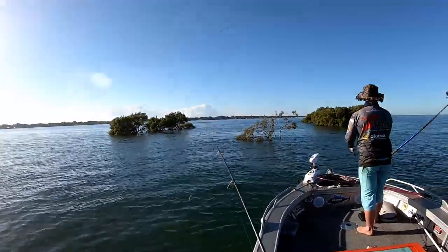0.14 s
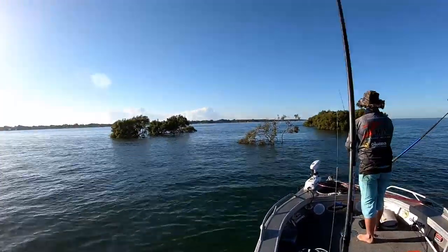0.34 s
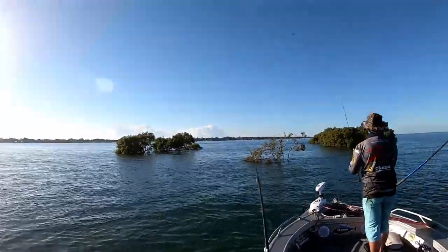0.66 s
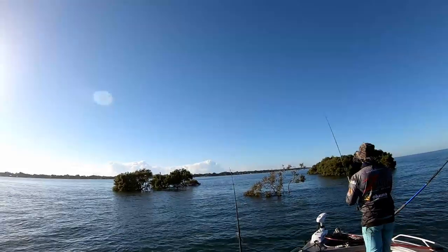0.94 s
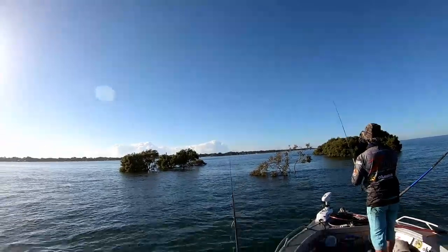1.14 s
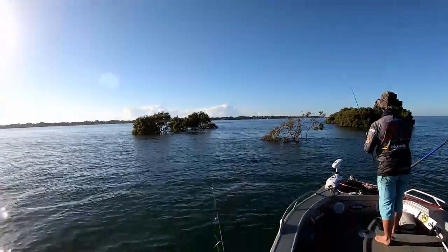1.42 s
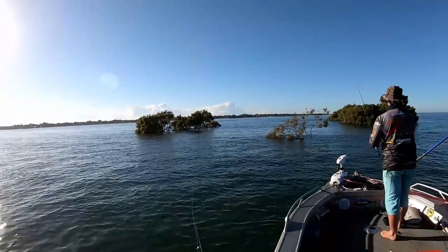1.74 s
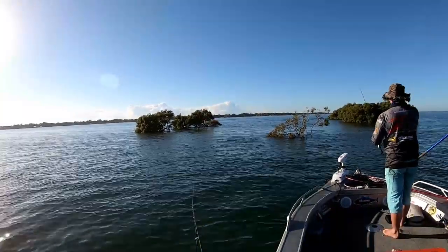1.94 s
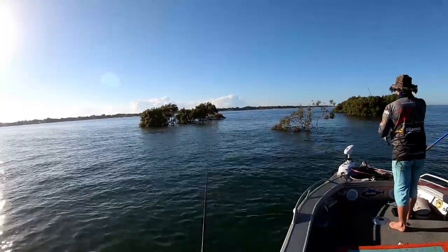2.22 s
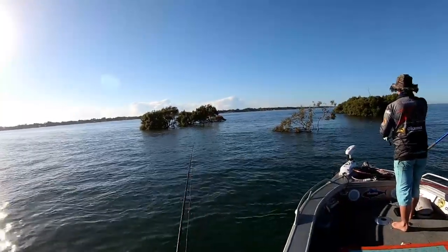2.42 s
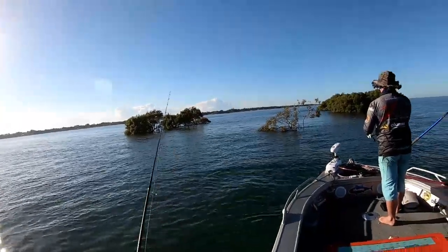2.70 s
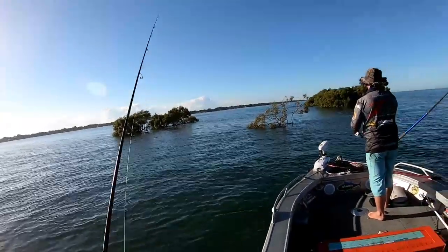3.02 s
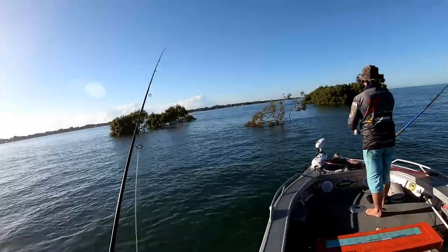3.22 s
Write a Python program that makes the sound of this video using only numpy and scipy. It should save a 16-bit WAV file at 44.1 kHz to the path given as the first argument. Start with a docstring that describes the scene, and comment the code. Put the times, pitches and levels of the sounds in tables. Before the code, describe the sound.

A small boat's electric motor hums while water laps and a fishing rod is cast.

```python
"""An electric motor hums, wind buffets the microphone and wavelets gulp and splash at a small fishing boat.
A rod is cast close by: the line whistles as it cuts the air, the rod swishes and line hisses off the reel.
The reel rattles, the tackle ticks now and then, and faint chirps, likely birds, come from far off.
The hum comes from the motor's turning shaft, the gulps from pockets of air ringing in the calm water."""
import sys
import numpy as np
from scipy import signal
from scipy.fft import rfft, irfft
from scipy.io import wavfile

SR = 44100
rng = np.random.default_rng(int(sys.argv[2]) if len(sys.argv) > 2 else 0)


def wrap_up_sound(samples):
    """Save the sound to the file named by the first command line argument, as 16-bit audio."""
    columns = np.atleast_2d(samples).T
    # keep every value between -1 and 1, then stretch to whole-number steps
    tamed = np.clip(columns, -1, 1)
    steps = np.round(tamed * 32767).astype(np.int16)
    wavfile.write(sys.argv[1], SR, steps)


N = 147735
T = np.arange(N) / SR


def from_db(db):
    """Turn decibels into a number to multiply a sound by."""
    return 10 ** (np.asarray(db) / 20)


def rms_one(x):
    """Scale a signal to an average power of 1."""
    return x / np.sqrt(np.mean(x ** 2) + 1e-20)


def in_time(rows):
    """Join a table's points with straight lines: one curve for each column after the time."""
    s, *columns = np.transpose(rows)
    return [np.interp(T, s, c) for c in columns]


def at_hz(points, hz):
    """Read between a table's frequencies, with octaves evenly spaced."""
    f, v = np.transpose(points)
    return np.interp(np.log(hz), np.log(f), v)


def pan(db):
    """Left and right gains that keep the total power; positive dB leans left."""
    gains = from_db(np.array([[.5], [-.5]]) * db)
    return gains / np.sqrt(np.mean(gains ** 2, axis=0))


def drift(hz):
    """A smooth random wobble, about 1 in size; more Hz makes it quicker."""
    r = np.exp(-80 * np.pi * hz / SR)
    slow = signal.lfilter([1], [1, -2 * r, r * r], rng.standard_normal(N // 40 + 2002))[2000:]
    return np.interp(np.arange(N) / 40, np.arange(len(slow)), rms_one(slow))


def filtered(x, hz, kind, order=2):
    """Keep the "low" side, the "high" side or a "band" of a sound."""
    return signal.sosfilt(signal.butter(order, hz, kind, fs=SR, output="sos"), x + 1e-18)


def ring(x, hz, decay_s):
    """Each click in x starts a tone that fades by 60 dB in decay_s."""
    r, w = from_db(-60 / (decay_s * SR)), 2 * np.pi * hz / SR
    return signal.lfilter([0, np.sin(w)], [1, -2 * r * np.cos(w), r * r], x + 1e-18)


def burst(s, rise_s, decay_s):
    """A straight rise from time s, then a fade of 60 dB in decay_s."""
    return np.clip((T - s) / rise_s, 0, 1) * from_db(-60 * np.clip((T - s - rise_s) / decay_s, 0, 4))


def noise_bands(colour, flicker_db):
    """Half-octave bands of flickering stereo noise, of total power 1, and their centre frequencies."""
    # how alike left and right are: (frequency [Hz], likeness [0-1])
    likeness = [(30, 0), (120, 0.86), (300, 1), (2000, 0.93), (5000, 1), (9000, 0.36)]
    edges = 20 * 2 ** np.arange(0, 9.6, .5)
    centres = np.sqrt(edges[1:] * edges[:-1])
    white, bands = rng.standard_normal((2, 2, N)), []
    for k, hz in enumerate(centres):
        mid, side = filtered(white[k % 2], edges[k:k + 2], "band")
        alike = at_hz(likeness, hz)
        gain = from_db(at_hz(colour, hz) + flicker_db * drift(15))
        bands.append(gain * (np.sqrt(1 + alike) * mid + np.sqrt(1 - alike) * side * [[1], [-1]]))
    return np.array(bands) / np.std(sum(bands)), centres


def noise(colour, flicker_db):
    """Stereo noise of power 1; its colour says how strong each frequency is."""
    return noise_bands(colour, flicker_db)[0].sum(axis=0)


def motor():
    """A turning shaft hums at multiples of its rate; the second, likely the propeller's, is loudest."""
    # tones of the hum: (multiple of the shaft rate, level [dB])
    tones = [(1, -6.5), (2, -3.5), (3, -18.5), (4, -17.5), (5, -24), (6, -30.5), (9, -35.5), (12, -33.5)]
    # how hard the motor works: (time [s], level [dB])
    load = [(0, -33.5), (1.0, -38), (1.5, -39.5), (2.3, -37), (2.9, -32.5), (3.35, -33)]
    shaft_hz = 44.7 * (1 + .00459 * drift(2.07))
    turn = 2 * np.pi * np.cumsum(shaft_hz) / SR
    hum = sum(from_db(db + drift(7.7)) * np.sin(k * turn + 2 * np.pi * rng.random()) for k, db in tones)
    return np.sqrt(2) * hum * from_db(in_time(load)[0]) * pan(db=4.5)


def wind():
    """Wind rumbles on the microphone, and single swirls of air suck and then push at its left side."""
    # wind strength: (time [s], level [dB], left minus right [dB])
    strength = [(0, -38, 31), (.15, -29.5, 41), (.36, -32.5, 28.5), (.52, -27.5, 33), (.68, -24, 37),
                (.78, -30.5, 34.5), (.95, -35, 31), (1.8, -41, -12), (2.3, -39.5, -3), (2.5, -41.5, -4),
                (2.9, -35, 26), (3.35, -34.5, 14.5)]
    # colour of the rumble: (frequency [Hz], level [dB])
    colour = [(20, -1), (40, 4), (65, 1.5), (120, -7.5), (170, -15), (300, -38.5), (600, -44.5),
              (1500, -99)]
    # thumping gusts: (centre time [s], peak level [dB], time from centre to peak [s])
    gusts = [(0.117, -17, 0.0048), (0.425, -17.5, 0.0054), (0.497, -10, 0.0022), (0.61, -25.5, 0.018),
             (0.65, -17, 0.01), (0.691, -13, 0.0022), (.735, -17.5, 0.0014)]
    thumps = np.zeros(N)
    for s, peak_db, to_peak in gusts:
        offset = (T - s) / to_peak
        thumps += from_db(peak_db) * offset * np.exp(1 - np.minimum(abs(offset), 20))
    db, side_db = in_time(strength)
    rumble = filtered(noise(colour, flicker_db=2), 31, "high")
    return from_db(db) * pan(side_db) * rumble + thumps * from_db([[0], [-28]])


def ripples():
    """Rippling water makes a soft wash with tiny ringing bubbles in it."""
    # strength of the ripples: (time [s], level [dB])
    strength = [(0, -54.5), (.5, -52.5), (1.1, -49.5), (1.4, -51), (1.55, -52.5), (2.1, -51), (2.3, -53.5),
                (2.6, -49.5), (2.9, -52.5), (3.15, -46), (3.35, -48)]
    # colour of the water: (frequency [Hz], level [dB])
    colour = [(100, -8), (220, 10), (350, -8.5), (650, -9), (1300, -16.5), (3200, -27), (4600, -35),
              (7000, -32), (9000, -54), (13000, -67)]
    bubbles_per_s, pitches = 170, np.geomspace(350, 4200, 20)
    pops = from_db(3.5 * np.minimum(rng.exponential(1, N), 2.8)) * rng.choice([-1, 1], N)
    pops *= rng.random(N) < bubbles_per_s / SR
    choice = rng.integers(0, len(pitches), N)
    bubbles = sum(ring(pops * (choice == k), hz, 14 / hz) * hz ** -.3 for k, hz in enumerate(pitches))
    water = noise(colour, flicker_db=1.5) + from_db(-11) * rms_one(bubbles)
    return from_db(in_time(strength)[0]) * water


def chirps():
    """Thin, unsteady tones, likely distant birds, each gliding through four pitches."""
    # calls: (start [s], length [s], level [dB], pitch at start, one third, two thirds, end [Hz])
    calls = [(-.01, .07, -65, 2650, 2750, 2900, 3050), (.055, .06, -56.5, 2300, 2600, 2560, 1650),
             (.09, .13, -71, 3550, 3560, 3470, 3400), (.125, .08, -67, 3000, 3060, 3020, 2900),
             (.14, .07, -65, 2020, 1930, 1790, 1700), (.152, .042, -58, 2600, 2380, 2220, 2190),
             (.265, .04, -64, 3300, 3180, 3190, 3330), (.297, .048, -56.5, 1750, 1960, 1900, 1730),
             (2.68, .125, -61, 2900, 3230, 3300, 4100)]
    out, waver = np.zeros(N), 1 + .012 * drift(220)
    for s, length, db, *pitches in calls:
        progress = np.clip((T - s) / length, 0, 1)
        hz = np.polyval(np.polyfit(np.linspace(0, 1, 4), pitches, 3), progress) * waver
        tone = np.sin(2 * np.pi * np.cumsum(hz) / SR)
        out += from_db(db + 2 * drift(60)) * np.sin(np.pi * progress) * tone
    return out


def far_off(x, decay_s=.45):
    """A soft echo from the shore blurs distant sounds."""
    tail = rng.standard_normal((2, SR)) * from_db(-60 * T[:SR] / decay_s)
    tail /= np.sqrt(np.sum(tail ** 2, axis=1, keepdims=True))
    return x + from_db(-6) * signal.fftconvolve(x[None], tail, axes=1)[:, :N]


def ticks(spread=1.45):
    """Bits of tackle touch in brief, dry ticks, each with its own brightness."""
    # ticks and scuffs: (start [s], level [dB], centre frequency [Hz], decay [s])
    contacts = [(0.241, -54.5, 5200, 0.018), (0.61, -58, 5050, 0.011), (0.689, -40, 2660, 0.012),
                (.727, -45, 7000, .014), (0.731, -30, 4970, 0.01), (1.614, -54, 5400, 0.016),
                (1.628, -52, 5000, 0.011), (1.793, -51, 1120, 0.041), (1.928, -41.5, 3130, 0.01),
                (1.939, -45, 4000, 0.02), (1.9458, -38, 2840, 0.016), (1.961, -48, 4740, .02),
                (1.969, -42, 3200, .011), (1.9944, -51, 2800, .013), (2.005, -47, 2600, 0.016),
                (2.258, -56, 2580, 0.042), (2.383, -58.5, 4350, 0.086), (2.431, -64.5, 7200, 0.096),
                (2.452, -57.5, 2600, 0.086), (2.513, -57.5, 3380, 0.025), (2.61, -44.5, 1280, 0.013),
                (2.837, -60, 2440, 0.031), (3.18, -60, 4850, 0.038), (3.279, -54.5, 5600, 0.027)]
    white, out = rng.standard_normal(N), np.zeros(N)
    for s, db, hz, decay in contacts:
        scuff = rms_one(filtered(white, [hz / spread, hz * spread], "band", order=3))
        out += from_db(db) * scuff * burst(s, .03 * decay, decay)
    return out


def line_hiss():
    """Line hisses off the reel and through the rod's rings."""
    # the running line: (time [s], level [dB])
    run = [(0, -89), (.25, -72), (.38, -62), (.55, -74), (.78, -57.5), (.84, -52.5), (1.0, -63), (1.4, -65),
           (1.55, -71.5), (1.82, -68), (2.0, -56), (2.06, -85)]
    # colour of the hiss: (frequency [Hz], level [dB])
    colour = [(400, 0), (1500, 4.5), (3200, 2.5), (5000, -9.5), (7000, -3), (9300, -8), (11000, -8),
              (14000, -18)]
    return from_db(in_time(run)[0] + drift(150)) * noise(colour, flicker_db=.6)


def splashes():
    """Wavelets break on the hull in short, grainy sprays."""
    # wavelets: (start [s], level at 1200 Hz [dB], rise [s], decay [s], brightness [dB per octave])
    wavelets = [(.312, -53, 0.012, 0.38, -3.5), (.945, -57, .01, 0.22, -8), (1.119, -56, .004, 0.13, 5.5),
                (1.42, -57.5, 0.043, 0.11, -5.5), (1.7, -55, 0.015, 0.12, -0.5),
                (1.916, -48, 0.017, 0.35, 3.5), (2.007, -48, 0.012, 0.17, -6), (2.041, -59.5, 0.04, .8, 0),
                (2.766, -53, 0.019, 0.18, -2), (3.022, -39, 0.022, .14, -2), (3.14, -51, 0.027, 0.16, -2.5)]
    # colour of the spray: (frequency [Hz], level [dB])
    colour = [(200, -2.5), (600, 4), (1200, 5), (1800, -0.5), (2400, -8.5), (3300, -5), (6000, -22.5),
              (9000, -25.5), (13000, -42)]
    bands, centres = noise_bands(colour, flicker_db=2.5)
    levels = np.array([from_db(db) * burst(s, rise, decay) for s, db, rise, decay, _ in wavelets])
    tilts = from_db(np.outer(np.log2(centres / 1200), np.array(wavelets)[:, -1]))
    spray = np.einsum("bcn,bn->cn", bands, tilts @ levels)  # add up the bands, each at its own level
    return spray * from_db(1.5 * drift(130))


def line_whistle():
    """The line cuts the air with a breathy whistle that follows its speed."""
    # path of the whistle: (time [s], pitch [Hz], level [dB])
    glide = [(.33, 9600, -103), (.44, 10000, -67.5), (.49, 9000, -66), (.52, 8200, -57), (.56, 7030, -62.5),
             (.6, 6520, -69.5), (.63, 6700, -57.5), (.66, 8600, -52.5), (.7, 9000, -68), (.76, 9350, -71)]
    hz, db = in_time(glide)
    blur = filtered(rng.standard_normal((2, 2, N)), 990, "low")  # smears the tone into a band of noise
    phase = 2 * np.pi * np.cumsum(hz) / SR
    whistle = rms_one(blur[0] * np.cos(phase) + blur[1] * np.sin(phase))
    sounding = (T > glide[0][0]) & (T < glide[-1][0])
    return whistle * from_db(db) * sounding * pan(db=4.5)


def rod_swish():
    """The rod rushes through the air, louder when faster, and the swing ends in a sharp swish."""
    # the rod's speed, heard as loudness: (time [s], level [dB])
    swing = [(.6, -100), (.65, -55), (.688, -40.5), (.712, -47), (.724, -44), (.731, -37), (.738, -44),
             (.749, -33), (.76, -43), (.785, -54), (.83, -81)]
    # colour of the rushing air: (frequency [Hz], level [dB])
    colour = [(300, -7.5), (900, -1.5), (1800, 1.5), (3200, -1), (5000, -13), (7500, 4.5), (10000, -26),
              (13000, -15)]
    # narrow peaks that colour the swish's noise: (frequency [Hz], level [dB])
    peaks = [(1403, -5), (1742, -2), (1971, -4), (2112, -6), (2401, -2), (2612, 0), (3475, -2), (3920, -5),
             (4245, -6), (4855, -3), (5688, -5), (7560, -9)]
    loudest_s, loudest_db, swell_s, decay_s = .749, -33, .07, .068
    rush = from_db(in_time(swing)[0] - 2 * drift(250)) * noise(colour, flicker_db=2.5)
    sharp_swish = sum(from_db(db + 3 * drift(50)) * np.sin(2 * np.pi * (hz * T + rng.random()))
                      for hz, db in peaks)
    fade_db = 60 * np.maximum((loudest_s - T) / swell_s, (T - loudest_s) / decay_s).clip(0, 4)
    return rush + rms_one(sharp_swish) * from_db(loudest_db - fade_db)


def washes(spread=1.26):
    """Water churns along the hull in narrow, bubbling bands of noise that die away."""
    # surges of water: (start [s], level [dB], centre frequency [Hz], rise [s], decay [s])
    surges = [(.937, -40.5, 493, 0.0029, .16), (1.139, -48, 447, 0.0079, 0.3),
              (1.25, -50.5, 930, .005, 0.18), (1.609, -54.5, 1045, 0.035, .7),
              (1.703, -52.5, 1370, 0.01, 0.065), (2.04, -57, 1250, 0.054, 2.26),
              (3.035, -40.5, 501, .012, 0.26)]
    white, out = rng.standard_normal(N), np.zeros(N)
    for s, db, hz, rise, decay in surges:
        churn = rms_one(filtered(white, [hz / spread, hz * spread], "band", order=3))
        out += from_db(db) * churn * burst(s, rise, decay)
    return out * from_db(-.5 * drift(60))


def gulps(pitch_rise=.093, roughness=.81):
    """Each pocket of air trapped at the hull swells, rings unsteadily and rises in pitch."""
    # air pockets: (start [s], level [dB], starting pitch [Hz], length [s])
    pockets = [(0.956, -41.5, 400, 0.021), (1.123, -30, 296, 0.016), (1.14, -38.5, 149, 0.035),
               (1.366, -42, 276, 0.084), (1.454, -46, 614, .022), (1.567, -37, 890, 0.0045),
               (1.574, -38, 760, 0.0024), (1.589, -33.5, 870, .016), (1.597, -34, 1074, 0.0099),
               (1.639, -48, 866, 0.011), (1.9175, -31, 1110, 0.0059), (1.92, -35.5, 214, .07),
               (1.927, -35.5, 1110, .006), (2.014, -46.5, 1230, 0.0074), (2.022, -41.5, 788, .025),
               (2.581, -53.5, 1910, .025), (3.042, -42.5, 1502, 0.028), (3.077, -47, 332, .2),
               (3.15, -36.5, 206.4, 0.055), (3.245, -53, 2146, 0.043)]
    out = np.zeros(N)
    for s, db, hz, length in pockets:
        age = np.clip((T - s) / length, 0, 10)
        swell = age / .28  # loudest at 28% of the length
        phase = 2 * np.pi * hz * length * (age + pitch_rise * age ** 2 / 2)
        churn = roughness * (drift(hz / 5) * np.sin(phase) + drift(hz / 5) * np.cos(phase))
        tone = (np.sin(phase) + churn) / np.sqrt(1 + 2 * roughness ** 2)
        out += from_db(db) * (swell * np.exp(1 - swell)) ** 2 * tone
    return out


def ratchet(start_s=1.8372, clicks_per_s=87, decay_s=.022):
    """The reel's ratchet gives a quick, even run of dry clicks, growing weaker."""
    # colour of the clicks: (frequency [Hz], level [dB])
    colour = [(500, -12), (950, 6.5), (1600, -6), (2800, -14), (6200, -17), (8500, -32)]
    clicks = np.zeros(N)
    for k in range(7):
        db = -42.5 - .7 * k + 1.5 * rng.standard_normal()
        clicks += from_db(db) * burst(start_s + k / clicks_per_s, .03 * decay_s, decay_s)
    return clicks * noise(colour, flicker_db=0)[0]


def deck_echoes(x):
    """Sound arrives directly, then again after bouncing off the deck and hull."""
    # echoes: (left delay [s], right delay [s], level [dB])
    echoes = [(.0043, .0051, -18), (0.0118, .0094, -9.5), (0.023, 0.02, -15.5)]
    return x + sum(from_db(db) * np.array([np.interp(T - lag, T, x, left=0) for lag in lags])
                   for *lags, db in echoes)


def from_the_side(x):
    """Sound from the side reaches the microphone's two openings with unequal level and timing."""
    # left against right: (frequency [Hz], left minus right [dB], left's lead [radians])
    sides = [(198, 1, 0.32), (506, 4, -1), (990, -1.5, -1.24), (2280, -6, -0.92), (4600, 0.5, -0.73),
             (8700, 1.5, -2.03)]
    hz = np.maximum(np.arange(N + 1) * SR / (2 * N), 1)
    db, lead = (at_hz(np.array(sides)[:, [0, k]], hz) for k in (1, 2))
    spectrum = rfft(np.hstack([x, x[:, ::-1]]))  # mirrored so that the ends join smoothly
    return irfft(spectrum * pan(db) * np.exp(1j * lead * np.array([[.5], [-.5]])))[:, :N]


def scene():
    """Everything heard from the deck."""
    hum_and_wind = motor() + wind()
    around = ripples() + rod_swish() + line_whistle() + line_hiss() + splashes() + washes()
    around += deck_echoes(gulps() + ticks() + ratchet())
    return hum_and_wind + from_the_side(around + far_off(chirps()))


def record(dry):
    """The stereo narrows almost to mono mid-way, the microphone dulls the treble and the top is cut."""
    # stereo width: (time [s], share of the left-right difference kept [0-1])
    width = [(0, 1), (.9, 0.96), (1.15, 0.63), (1.4, 0.23), (1.9, 0.018), (2.4, 0.017), (2.9, 0.29),
             (3.05, 0.89), (3.35, 0.94)]
    mid = dry.mean(axis=0)
    narrowed = mid + (dry - mid) * in_time(width)[0]
    dulled = filtered(narrowed, 9850, "low", order=4)
    return signal.sosfilt(signal.ellip(10, .1, 80, 13700, fs=SR, output="sos"), dulled)


dry = scene()
out = record(dry)
wrap_up_sound(out)
```